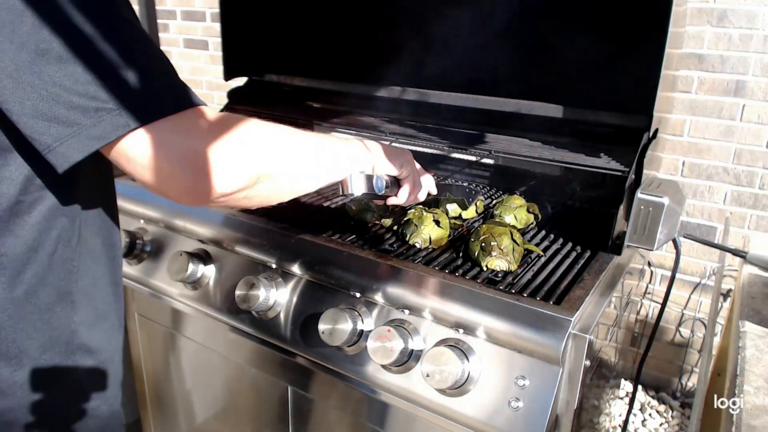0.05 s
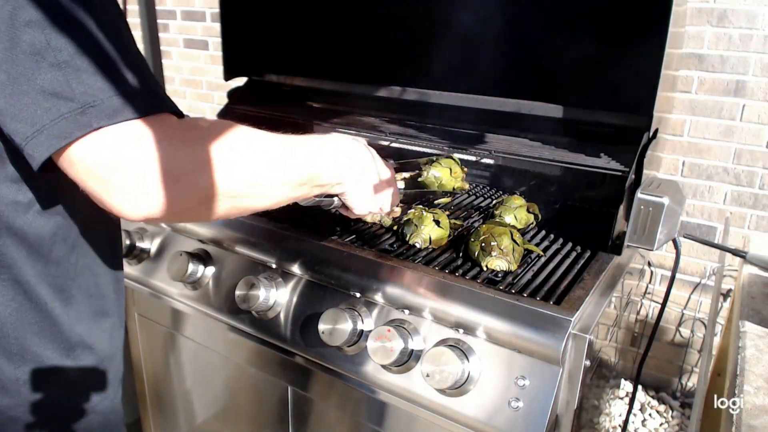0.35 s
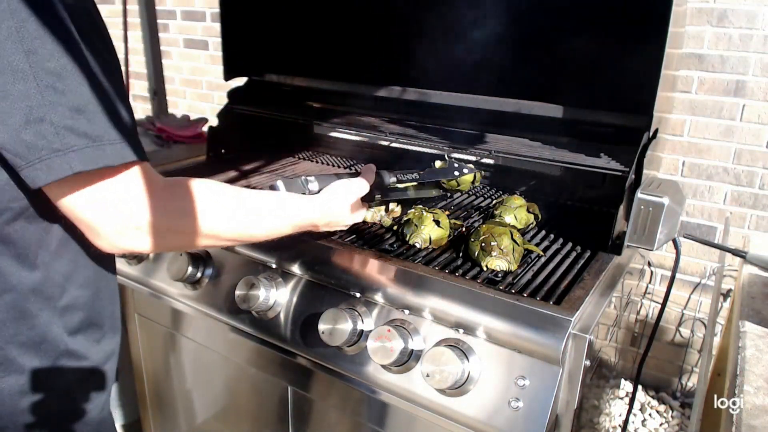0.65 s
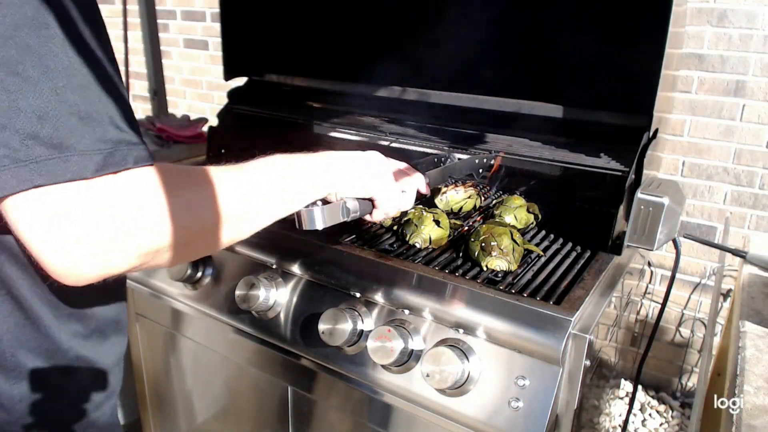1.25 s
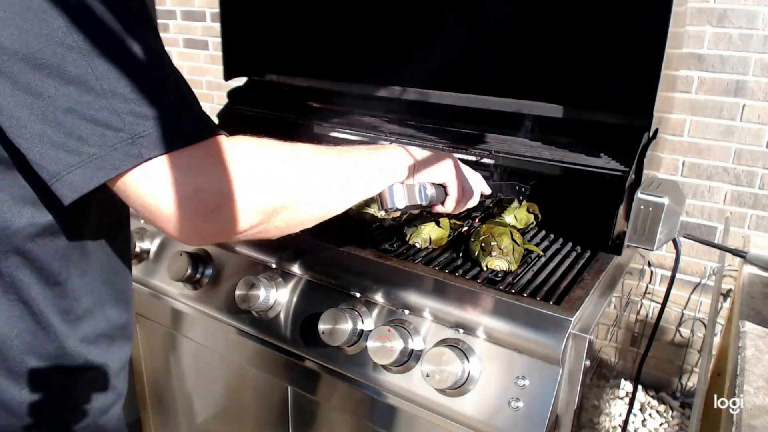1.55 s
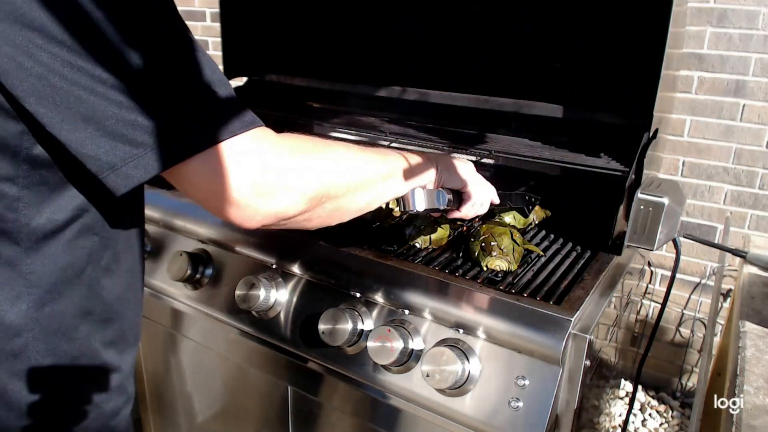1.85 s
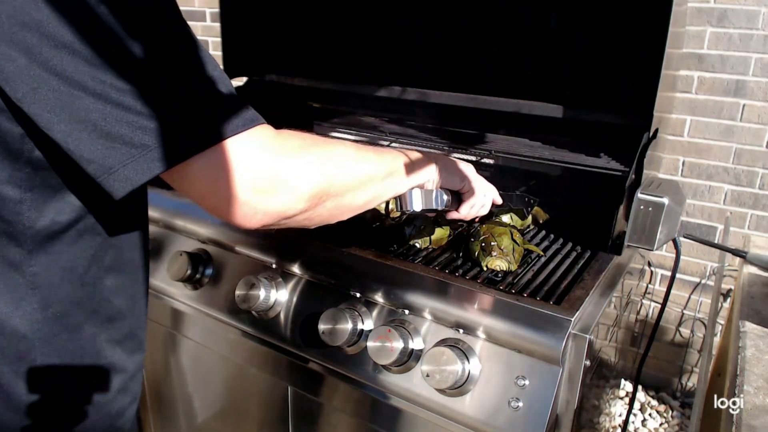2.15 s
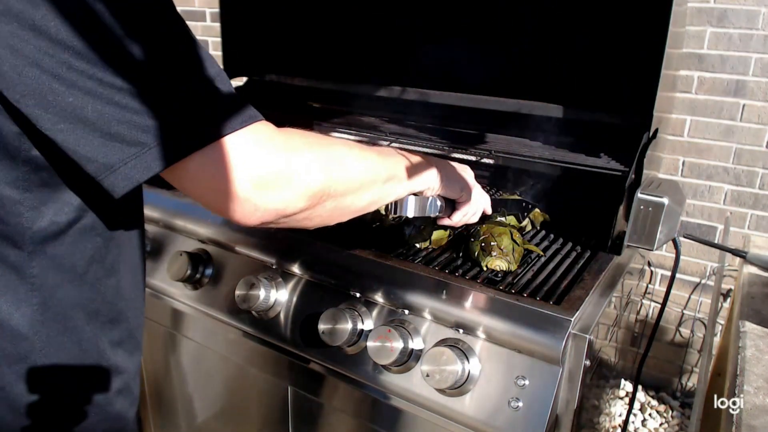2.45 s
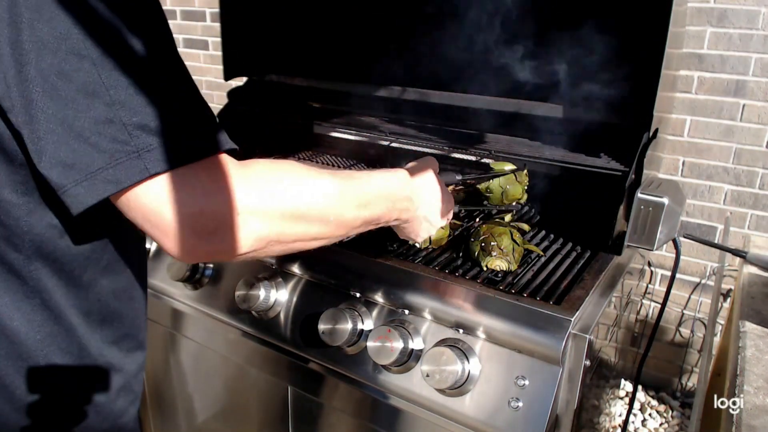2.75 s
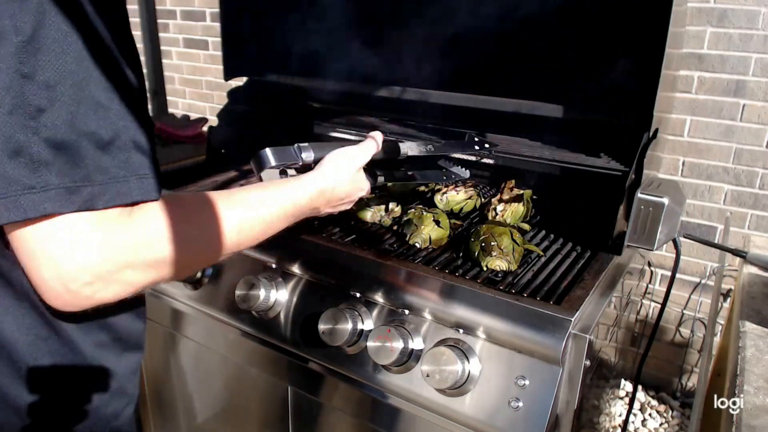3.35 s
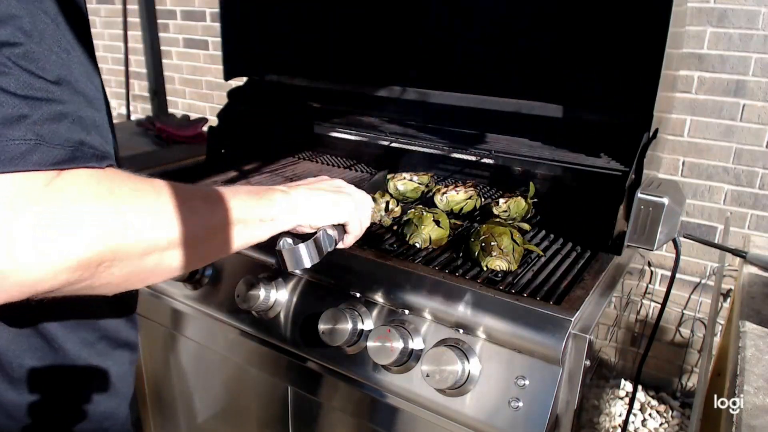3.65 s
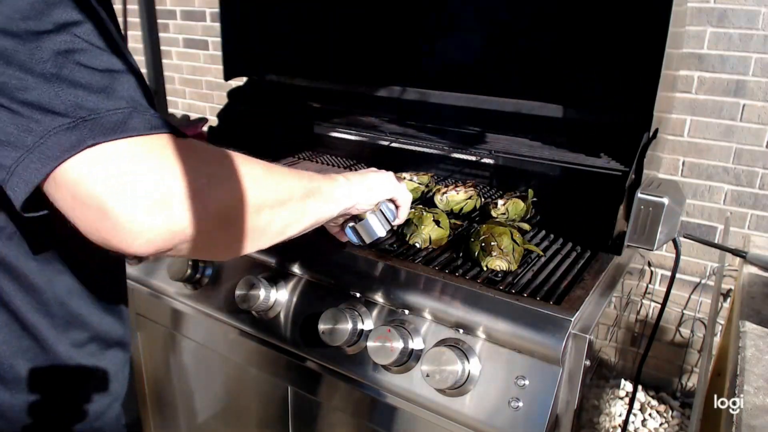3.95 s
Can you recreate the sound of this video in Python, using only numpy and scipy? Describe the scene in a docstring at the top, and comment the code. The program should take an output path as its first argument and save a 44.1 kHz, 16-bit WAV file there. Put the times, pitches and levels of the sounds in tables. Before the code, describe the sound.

Three ringing metal clanks on a grill grate, the last one rattling, over faint sizzling.

```python
"""Light ticks of steel tongs and the scrape of vegetables open the scene, at a gas grill in a yard.
The tongs clink shut; then the loose grate clanks twice and rattles, each impact exciting the damped
modes of its bars and steel firebox. After the first clank, juice sizzles up in tiny bursts of steam.
A turbulent breeze buffets the small two-port microphone close by."""
import sys
import numpy as np
from scipy import signal
from scipy.fft import rfft, irfft
from scipy.io import wavfile
from scipy.ndimage import uniform_filter1d

SR = 44100
rng = np.random.default_rng(int(sys.argv[2]) if len(sys.argv) > 2 else 0)


def master(y):
    """Save y as 16-bit WAV."""
    cut = np.clip(np.atleast_2d(y).T, -1, 1)
    pcm = np.round(cut * 32767)  # scale
    wavfile.write(sys.argv[1], SR, pcm.astype(np.int16))


N = 176400
TIME = np.arange(N) / SR

# impacts on the grate (time [s], level [dB], rise time [s], kind of contact)
IMPACTS = [(1.597, -1.5, 0.013, "knock"), (1.617, -8, .005, "knock"), (2.988, -1.5, 0.015, "drop"),
           (3.012, -3.5, .008, "drop"), (3.071, -15, .005, "drop"), (3.806, -8, .003, "rattle"),
           (3.811, -1.5, .011, "rattle"), (3.833, -3.5, .006, "rattle"), (3.853, -5.5, .006, "rattle"),
           (3.882, -1.5, 0.012, "rattle"), (3.914, -4, 0.006, "rattle"), (3.947, -7, 0.0036, "rattle"),
           (3.968, 0, .012, "rattle")]
CONTACTS = ["knock", "drop", "rattle"]
STILL = -np.inf  # level of a mode that a contact leaves at rest
# modes of grate and firebox (frequency [Hz], T60 [s], knock level [dB], drop [dB], rattle [dB])
GRATE_MODES = [(217, 0.64, STILL, -32.5, STILL), (303.8, 0.84, STILL, -32.5, STILL),
               (353.6, 0.43, -32.5, -32.5, -36.5), (674.5, 0.51, -35.5, STILL, STILL),
               (794, 0.64, -40.5, STILL, -37), (894, 0.26, -27, STILL, -57),
               (1020, 0.29, -27.5, -29.5, -40), (1178, 0.2, STILL, -33, -29), (1295, 0.19, -50, -27.5, -24),
               (1375, 0.55, -26.5, -32.5, -32.5), (1424, 1, -42, STILL, -35), (1562, 0.54, -40, -40, -38),
               (1590, 0.59, STILL, -44.5, STILL), (1878, 0.21, -30, STILL, -34),
               (2177, 0.12, -22, STILL, -36), (2452, 0.35, -34.5, STILL, -38.5),
               (2905, 0.6, STILL, -37, STILL), (3216, 0.33, -42.5, -39, -44), (3680, 0.23, -36, -31, -47),
               (4000, 0.3, STILL, -35, STILL), (4670, 0.16, STILL, STILL, -45),
               (4800, 0.42, -49.5, -46, -56), (5080, 0.33, STILL, STILL, -52),
               (7200, 0.25, STILL, -38, STILL)]
# sheet-metal clatter by kind of contact (frequency [Hz], relative density [dB])
CLATTER_SPECTRA = {"knock": [(100, -33), (240, -11.5), (560, -11), (880, 3.5), (1170, -11), (1420, 4.5),
                   (1680, -11.5), (2250, -4), (2650, -16), (3700, -13), (4300, -19), (7500, -31),
                   (15500, -38.5)], "drop": [(100, -5), (260, -0.5), (420, -5), (580, -2), (850, -12.5),
                   (1330, -2.5), (1750, -11.5), (2400, -14.5), (3700, -10), (4600, -13.5), (7200, -16),
                   (8200, -29.5), (15500, -36)], "rattle": [(250, -17), (560, -15), (780, -4.5),
                   (1100, -4.5), (1350, 4), (1690, -15.5), (1950, -5), (2450, -14.5), (2900, -15.5),
                   (3600, -20.5), (4300, -25), (4850, -19), (6500, -30.5), (8200, -35.5), (15500, -42)]}
# strength of the clatter (kind of contact, gain [dB])
CLATTER_GAINS = {"knock": -23, "drop": -23, "rattle": -24.5}
# damping of the firebox (frequency [Hz], T60 [s])
FIREBOX_T60 = [(150, 0.84), (1400, 0.41), (5000, 0.23), (15000, 0.39)]
# modes of the tongs (frequency [Hz], level [dB], T60 [s])
TONG_MODES = [(1018, -46, 0.28), (1258, -40.5, 0.3), (1358, -45.5, 0.5), (1500, -49, 0.71),
              (2057, -38, 0.22), (2960, -41.5, 0.29), (3074, -48, 0.45), (3220, -46, 0.58)]
# noisy part of the clink (frequency [Hz], relative density [dB])
CLINK_SPECTRUM = [(400, -3.5), (1300, 7), (1900, 0), (2400, -20), (3100, 2), (4100, -6.5), (7500, -11.5),
                  (15500, -31)]
# dry ticks of tongs and crisp leaves, and the sharp attack of the grate's drop at 2.989 s (time [s], level
# [dB], rise time [s], T60 [s])
TICKS = [(0.034, -43, 0.005, 0.29), (0.756, -44, 0.00093, 0.061), (0.9557, -41, 0.0019, 0.15),
         (1.107, -51, 0.0017, 0.11), (2.746, -48, 0.0036, 0.24), (2.904, -49.5, 0.00078, 0.036),
         (2.989, -24, 0.0029, 0.038)]
# spectrum of a tick (frequency [Hz], relative density [dB])
TICK_SPECTRUM = [(200, -6.5), (2000, -0.5), (7000, -0.5), (8500, -13.5), (15500, -20.5)]
# bars singing under the sliding tongs (time [s], duration [s], frequency [Hz], level [dB])
SQUEAKS = [(0.089, 0.038, 1926, -52), (0.237, 0.21, 1403, -61), (2.229, 0.054, 1340, -51.5),
           (2.275, 0.043, 359, -46), (2.919, 0.17, 993, -60), (3.153, 0.077, 1370, -43),
           (3.262, 0.092, 1381, -51.5), (3.278, 0.12, 879, -57.5), (3.481, 0.097, 870, -63)]
# envelope of the boiling juice (time [s], level [dB])
SIZZLE_ENVELOPE = [(0, -64), (.9, -67.5), (1.08, -58.5), (1.25, -66), (1.55, -68.5), (1.86, -56.5),
                   (2.0, -49), (2.18, -46.5), (2.31, -43.5), (2.45, -48.5), (2.68, -61), (2.85, -67),
                   (3.3, -61.5), (4, -72)]
# spectrum of the steam bursts (frequency [Hz], relative density [dB])
SIZZLE_SPECTRUM = [(300, -22), (2300, -2.5), (4000, -2), (5800, 2), (7300, 2), (8400, -12.5), (11300, -13),
                   (12300, -19), (15500, -17.5)]
# envelope of food dragged over the bars (time [s], level [dB])
DRAG_ENVELOPE = [(0, -53), (.25, -71.5), (.72, -61.5), (1.2, -70.5), (2.1, -69.5), (2.27, -48.5),
                 (2.38, -71), (2.58, -56), (2.7, -66.5), (3.2, -62.5), (3.7, -69.5)]
# spectrum of its friction (frequency [Hz], relative density [dB])
DRAG_SPECTRUM = [(100, -5.5), (320, 6), (450, -0.5), (900, 4.5), (1150, -2), (1380, 2), (1900, -9.5),
                 (15000, -28.5)]
# wind at the left port (time [s], level [dB])
WIND_ENVELOPE = [(1.83, -66), (1.94, -47), (2.28, -29.5), (2.42, -43.5), (2.53, -34.5), (2.67, -56.5),
                 (2.77, -42), (2.94, -41), (2.98, -31), (3.15, -19), (3.21, -27.5), (3.4, -42), (3.51, -25),
                 (3.76, -44), (3.85, -33), (4, -25.5)]
# spectrum of the turbulence (frequency [Hz], relative density [dB])
WIND_SPECTRUM = [(12, -21), (28, -1), (48, 5), (110, -10), (170, -24.5), (300, -32), (3000, -102)]
# single pressure pulses (time [s], left level [dB], right level [dB], width [s])
BUFFETS = [(2.345, -16, -38, 0.011), (2.984, -17, -53, 0.0075), (3.263, -34, -17.5, 0.004)]
# ambient noise of the yard (frequency [Hz], relative density [dB])
YARD_SPECTRUM = [(20, -4), (70, 6.5), (300, -2.5), (700, -7), (1300, -20), (7000, -19), (9000, -42),
                 (15500, -65)]
# the two ports compared (frequency [Hz], correlation [0-1], left minus right level [dB])
PORTS = [(100, 0.87, 7.5), (1310, 0.57, 6), (2380, 0.17, 4.5), (4400, 0.26, 2.5), (14800, 0, 1.6)]

BOX_LAG_S, BOX_HZ = 0.023, 470  # the firebox's low modes swell later


def grate(split_hz=19, twin_db=-5):
    """Modal ringing: impacts add energy to the modes, and each mode beats with a near twin."""
    out, t = np.zeros((2, N)), TIME[:SR]
    for hz, t60, *contact_dbs in GRATE_MODES:
        energy = np.zeros((1, N))
        envelope = decay(t, t60) * ramp(t, BOX_LAG_S * BOX_HZ / hz)
        for onset, db, rise_s, kind in IMPACTS:
            amplitude = amp(db + contact_dbs[CONTACTS.index(kind)]) * contact(t, rise_s) * envelope
            add(energy, onset, amplitude[None] ** 2)
        twin_hz = hz + split_hz * rng.uniform(.5, 2) * rng.choice([-1, 1])
        out += np.sqrt(energy) * (tone(TIME, hz) + amp(twin_db) * tone(TIME, twin_hz))
    return out


def firebox_clatter(resonances, crack_db=-4):
    """Modal overlap: each impact cracks, and the dense sheet-metal modes merge into decaying noise."""
    out, t = np.zeros((2, N)), TIME[:SR]
    for onset, db, rise_s, kind in IMPACTS:
        spectrum, gain = CLATTER_SPECTRA[kind], amp(db + CLATTER_GAINS[kind])
        hz, frame_s, bands = signal.stft(noise(overlay(spectrum, resonances), SR), SR, nperseg=512)
        hz = hz[:, None]
        lag_s = BOX_LAG_S / (1 + (hz / BOX_HZ) ** 2)
        growth = 1 - np.exp(-(frame_s + frame_s[1] / 2) / lag_s)
        damping = decay(frame_s, lookup(FIREBOX_T60, hz))
        tail = signal.istft(bands * damping * growth, SR, nperseg=512)[1][:, :SR]
        add(out, onset, gain * contact(t, rise_s) * tail)
        crack = amp(crack_db) * noise(spectrum, SR) * decay(t, t60=0.016)
        add(out, onset + rise_s, gain * crack)
    return out


def tongs(steel, clink_s=.755, clink_noise_db=-42):
    """Free vibration: the arms ring as they snap shut once; light touches give brief ticks, and the grate's
    drop adds a sharp one."""
    out, t = np.zeros((2, N)), TIME[:SR]
    modes = sum(amp(db) * decay(t, t60) * tone(t, hz) for hz, db, t60 in TONG_MODES)
    body = amp(clink_noise_db) * noise(overlay(CLINK_SPECTRUM, steel), SR) * decay(t, t60=0.42)
    add(out, clink_s, (modes + body) * contact(t, rise_s=0.021))
    for onset, db, rise_s, t60 in TICKS:
        envelope = amp(db) * ramp(t, rise_s) * decay(t, t60)
        add(out, onset, envelope * noise(overlay(TICK_SPECTRUM, steel), SR))
    return out


def bar_squeaks(width_hz=20):
    """Frictional excitation: the sliding tongs drive one narrow resonance of a bar at a time."""
    out, t = np.zeros((2, N)), TIME[:SR]
    hz = np.arange(0, SR / 2, 5)
    for onset, duration, centre_hz, db in SQUEAKS:
        peak_db = -20 * np.log10(1 + ((hz - centre_hz) / width_hz) ** 2)
        envelope = amp(db) * np.sin(np.pi * np.sqrt(ramp(t, duration)))
        add(out, onset, envelope * noise(np.column_stack([hz, peak_db]), SR))
    return out


def sizzle(bursts_per_s=2300, spread_db=3, burst_weight=0.44, patch_db=3, patch_s=.03, patch_hz=700):
    """Shot noise: tiny steam bursts over a hiss; random level patches in time and frequency flicker."""
    sizes = amp(spread_db * np.minimum(rng.exponential(1, N), 5))
    bursting = rng.random(N) < bursts_per_s / SR
    bursts = unit_rms(sizes * bursting * rng.standard_normal((2, N)))
    hiss = np.sqrt(1 - burst_weight ** 2) * rng.standard_normal((2, N))
    hz, frame_s, bands = signal.stft(burst_weight * bursts + hiss, SR, nperseg=512)
    patches = uniform_filter1d(rng.standard_normal(bands.shape[1:]), round(patch_s / frame_s[1]), axis=1)
    patches = unit_rms(uniform_filter1d(patches, round(patch_hz / hz[1]), axis=0))
    flickering = signal.istft(bands * amp(patch_db * patches), SR, nperseg=512)[1][:, :N]
    hood = ripple(db=2.5)  # the open hood colours the sizzle
    return level(SIZZLE_ENVELOPE) * at_ports(flickering, overlay(SIZZLE_SPECTRUM, hood))


def food_drag(steel):
    """Friction noise: food slides over the bars, filtered by the resonances of the steel."""
    return level(DRAG_ENVELOPE) * noise(overlay(DRAG_SPECTRUM, steel), N)


def wind(right_db=-14):
    """Turbulence: slow pressure fluctuations, uncorrelated at the two ports, with single buffets."""
    hz = np.fft.rfftfreq(N, 1 / SR)
    eddies = irfft(rfft(rng.standard_normal((2, N))) * amp(lookup(WIND_SPECTRUM, hz)), N)
    out = unit_rms(eddies) * level(WIND_ENVELOPE)
    out[1] *= amp(right_db)
    for centre_s, *port_dbs, width_s in BUFFETS:
        u = (TIME - centre_s) / width_s
        out += amp(port_dbs)[:, None] * (1 - 2 * u ** 2) * np.exp(-u ** 2)
    return out


def yard(db=-60.5):
    """Stationary noise: the faint, low background of the open air."""
    return amp(db) * noise(YARD_SPECTRUM, N)


def tone(t, hz, wavers_per_s=45, waver_db=2.5, waver_s=.00007):
    """Amplitude and phase modulation: a sinusoid wavers as the loose metal shifts."""
    gains = port_gains(np.array(float(hz)))[:, None]
    knots = rng.standard_normal((2, 1000))
    loudness, drift = (np.interp(t * wavers_per_s, np.arange(len(k)), k) for k in knots)
    phase = 2 * np.pi * (hz * (t + waver_s * drift) + rng.random())
    return amp(waver_db * loudness) * abs(gains) * np.cos(phase + np.angle(gains))


def ripple(db, width_hz=26, from_hz=910):
    """Statistical response: random resonances, fading below from_hz (frequency [Hz], gain [dB])."""
    hz = np.arange(0, SR / 2, 5)
    peaks = unit_rms(uniform_filter1d(rng.standard_normal(len(hz)), round(width_hz / hz[1])))
    return np.column_stack([hz, db * peaks * hz / np.hypot(hz, from_hz)])


def overlay(spectrum, resonances):
    """Filters in cascade: the decibels of a spectrum and of its fine resonances add."""
    hz, fine_db = resonances.T
    return np.column_stack([hz, lookup(spectrum, hz) + fine_db])


def port_gains(hz, left_lag_s=.000042):
    """Level and time differences between the ports, as complex gains."""
    tilt = amp(lookup(PORTS, hz, column=2) / 2)
    return np.array([tilt * np.exp(-2j * np.pi * hz * left_lag_s), 1 / tilt])


def at_ports(pair, spectrum):
    """Partial coherence: two uncorrelated signals are blended for the ports and filtered, at RMS 1."""
    size = pair.shape[1]
    hz = np.fft.rfftfreq(size, 1 / SR)
    left, independent = rfft(pair)
    correlation = lookup(PORTS, hz)
    right = correlation * left + np.sqrt(1 - correlation ** 2) * independent
    ports = np.array([left, right]) * port_gains(hz)
    return unit_rms(irfft(ports * amp(lookup(spectrum, hz)), size))


def noise(spectrum, size):
    """Filtered Gaussian noise at both ports."""
    return at_ports(rng.standard_normal((2, size)), spectrum)


def contact(t, rise_s):
    """Quadratic onset: contact tightens gradually, so a blow starts softly."""
    return ramp(t, rise_s) ** 2


def ramp(t, rise_s):
    """Linear rise to 1."""
    return np.minimum(t / rise_s, 1)


def decay(t, t60):
    """Exponential damping by 60 dB in t60 seconds."""
    return np.exp(-np.log(1000) * t / t60)


def amp(db):
    """Amplitude ratio from decibels."""
    return 10 ** (np.asarray(db) / 20)


def unit_rms(x):
    """Normalisation to RMS 1."""
    return x / np.sqrt(np.mean(x ** 2) + 1e-20)


def lookup(table, hz, column=1):
    """Interpolation on a log-frequency axis."""
    columns = np.transpose(table)
    return np.interp(np.log(hz + 1), np.log(columns[0] + 1), columns[column])


def level(points):
    """Amplitude envelope from (time [s], level [dB])."""
    return amp(np.interp(TIME, *np.transpose(points)))


def add(mix, onset, sound):
    """Superposition of a sound on the mix from its onset in seconds."""
    part = mix[:, round(onset * SR):][:, :sound.shape[1]]
    part += sound[:, :part.shape[1]]


def scene():
    """Superposition of grill, tongs, food and open air."""
    steel = ripple(db=4)  # countless lesser resonances of the sheet metal
    high_partials = ripple(db=5, width_hz=70, from_hz=11000)
    firebox = overlay(steel, high_partials)
    drag = food_drag(steel)
    metal = grate() + firebox_clatter(firebox) + tongs(steel) + bar_squeaks()
    return metal + sizzle() + drag + wind() + yard()


def record(dry):
    """Band limiting: a linear-phase low-pass filter at 15.9 kHz."""
    lowpass = signal.firwin(511, 15900, window=("kaiser", 9), fs=SR)
    return signal.oaconvolve(dry, lowpass[None], "same")


dry = scene()
out = record(dry)
master(out)
```